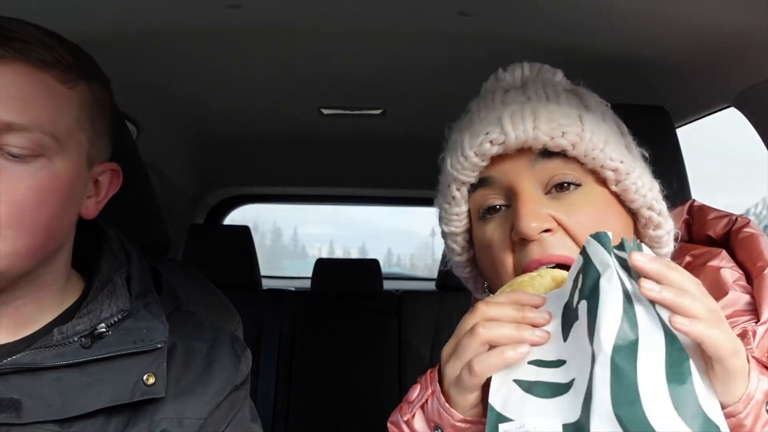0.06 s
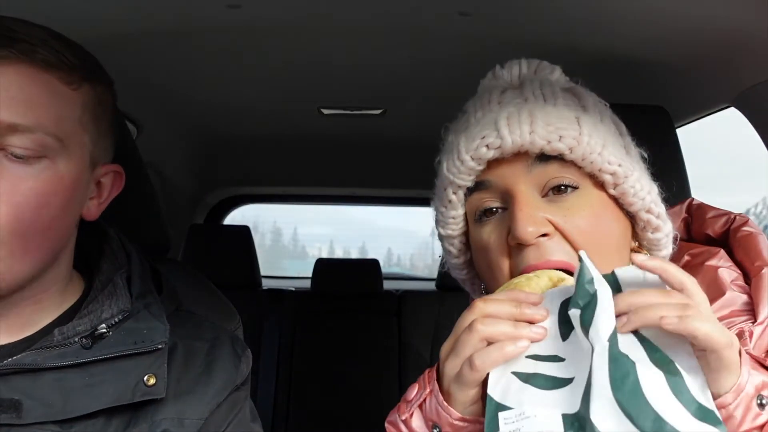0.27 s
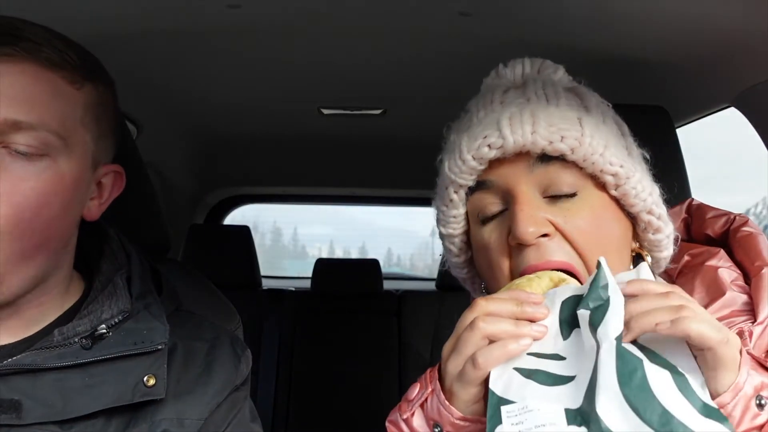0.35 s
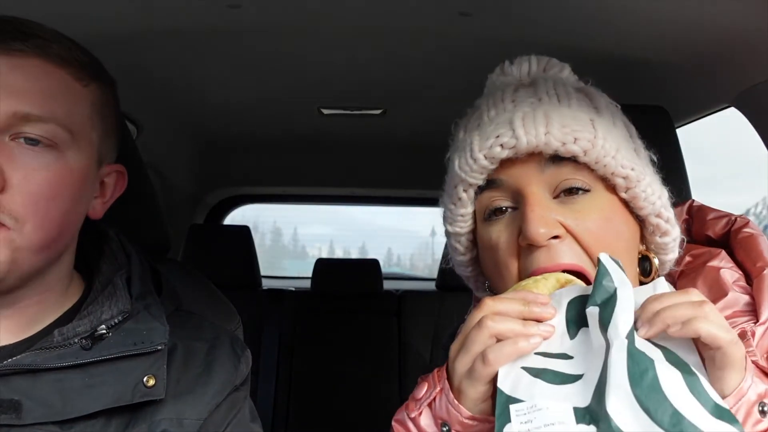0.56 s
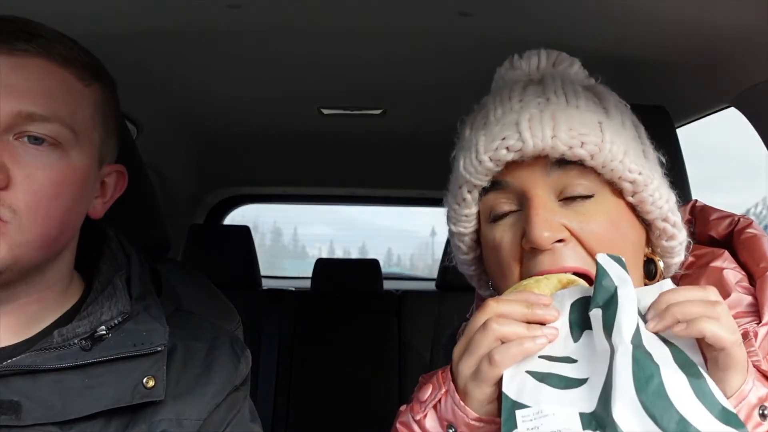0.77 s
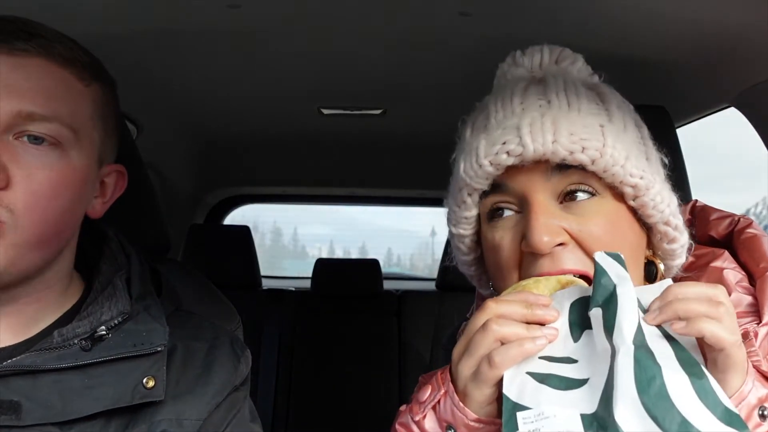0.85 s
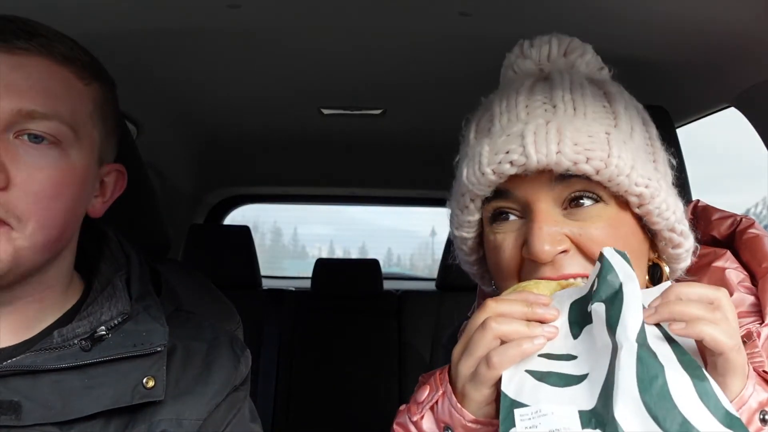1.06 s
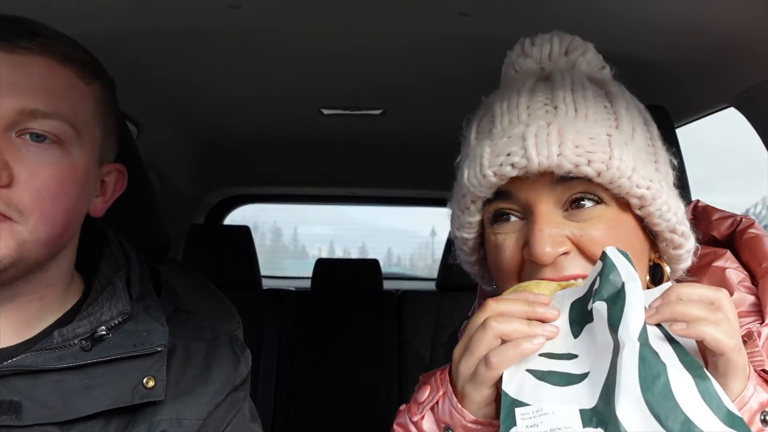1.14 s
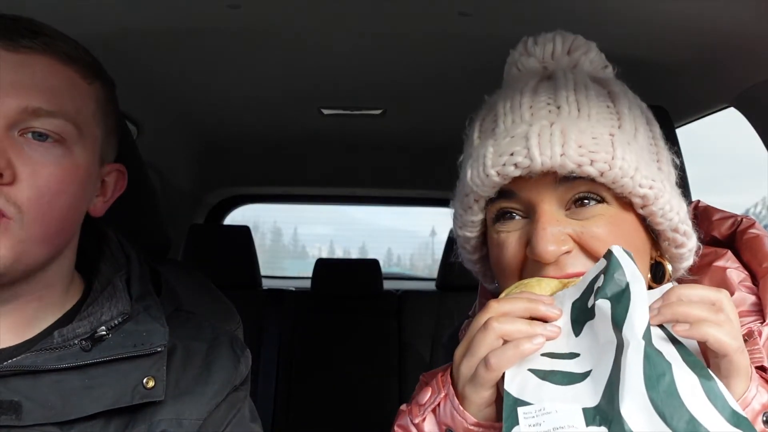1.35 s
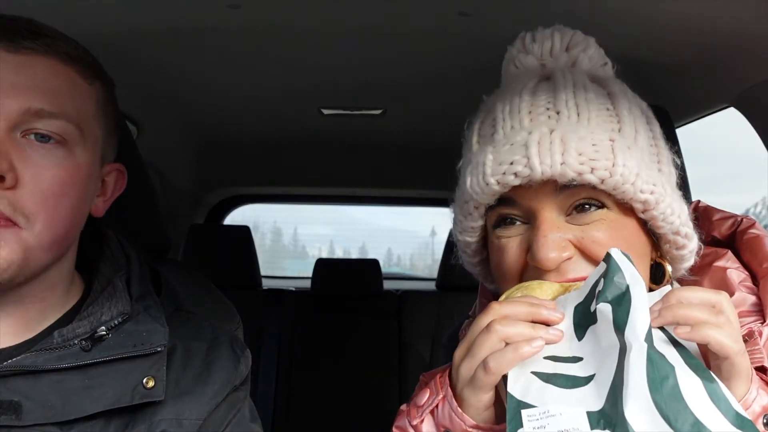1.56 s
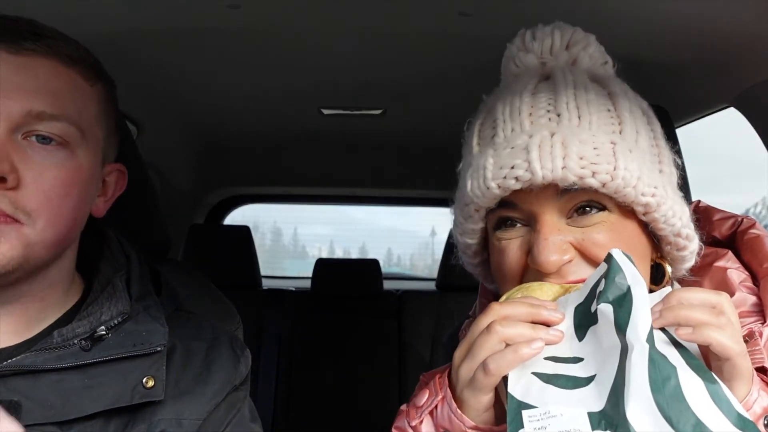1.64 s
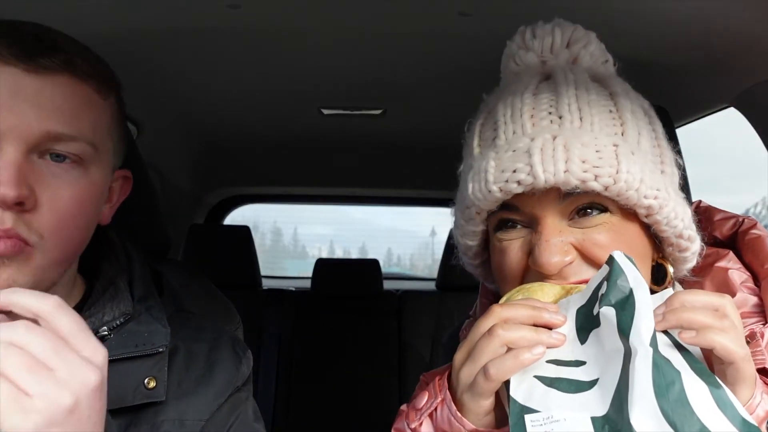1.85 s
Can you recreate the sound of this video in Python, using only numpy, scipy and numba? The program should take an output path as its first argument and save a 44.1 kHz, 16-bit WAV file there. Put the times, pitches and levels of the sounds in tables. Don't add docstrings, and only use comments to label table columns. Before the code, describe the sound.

A paper food bag crinkles in the hands, close to a phone in a parked car. Soft rustling starts it, then loud bright snaps and dense crackling from 0.2 to 0.75 s, with small hollow puffs. Another sharp crackle comes near 0.85 s, then lighter, sparser ticks, one clear snap at 1.46 s, and padded jackets brushing around 1.6 and 1.8 s. Short dry cabin tail, faint hiss.

```python
import sys
import numpy as np
from scipy import signal
from scipy.fft import rfft, irfft
from scipy.io import wavfile
from scipy.ndimage import uniform_filter1d
from numba import njit

SR = 44100
rng = np.random.default_rng(int(sys.argv[2]) if len(sys.argv) > 2 else 0)


def store_wav(level_fs):
    pcm = np.round(np.clip(np.atleast_2d(level_fs), -1, 1) * 32767)
    wavfile.write(sys.argv[1], SR, pcm.T.astype(np.int16))


def level_to_linear(level):
    exponent = np.asarray(level, float) / 20
    return 10 ** exponent


N = 83790
TREBLE_HZ = 5500


def unit(x):
    return x / np.sqrt(np.mean(x ** 2))


def split(x, hz):
    low = signal.sosfilt(signal.butter(2, min(hz, 0.45 * SR), fs=SR, output="sos"), x)
    return low, x - low


def colour(x, points):
    freq_hz, gain_db = np.array(points, float).T
    f = np.maximum(np.arange(1025) * SR / 2048, 1)
    curve_db = np.interp(np.log(f), np.log(freq_hz), gain_db)
    cepstrum = irfft(np.log(level_to_linear(curve_db)))
    cepstrum[1:1024] *= 2
    cepstrum[1025:] = 0
    response = irfft(np.exp(rfft(cepstrum)))
    return signal.fftconvolve(x, response[None], axes=1)[:, :N]


@njit
def grains(at, hz, cycles, size, zone, zones, n):
    out = np.zeros((zones, n))
    for k in range(len(at)):
        turn = np.exp((2j * np.pi - 1 / cycles[k]) * hz[k] / SR)
        state = size[k] + 0j
        end = min(n, at[k] + int(6 * cycles[k] * SR / hz[k]) + 1)
        for i in range(at[k], end):
            out[zone[k], i] += state.imag
            state *= turn
    return out


# start_s, peak_db, ring_hz, tear_db (re
CREASES = [(0.0186, -22.5, 3140, -20), (0.0427, -31.5, 2170, 13.5), (0.0487, -30.5, 7740, 9),
           (0.0667, -30.5, 3370, 7.5), (0.1153, -42, 5300, 8), (0.1261, -28, 1590, 4.5),
           (0.2149, -11, 4170, -2.5), (0.238, -37, 2160, -9), (0.2478, -23.5, 1610, 21.5),
           (0.324, -16.5, 9050, 1), (0.345, -8.5, 8550, -5), (0.384, -20, 2320, 10),
           (0.414, -20, 3620, 0), (0.4237, -28, 6840, 1), (0.4436, -6.5, 7560, -25),
           (0.4554, -19.5, 8400, 1), (0.473, -16.5, 1510, -28), (0.5057, -22, 5600, -8),
           (0.5134, -29, 5730, 8), (0.5204, -27.5, 5340, 14.5), (0.5364, -28, 3500, 12.5),
           (0.5578, -24.5, 1550, 10.5), (0.5743, -23.5, 2020, -9), (0.609, -22, 8300, 6),
           (0.621, -8.5, 8660, -6.5), (0.6354, -29, 1570, 13.5), (0.6667, -16.5, 3870, 9),
           (0.692, -24.5, 1630, 3), (0.7407, -17.5, 7230, -1),
           (0.8, -37, 3520, 17.5), (0.8353, -12, 7400, 0), (0.8581, -23, 2200, 14.5),
                 (0.862, -7, 8500, -20), (0.8825, -26, 4030, 10), (0.9253, -33.5, 1520, -6),
                 (0.952, -33, 1480, -1), (0.986, -32.5, 5850, 6), (1.0355, -21.5, 7000, 0.5),
                 (1.055, -20, 7800, -4.5), (1.0708, -22, 3680, 4.5), (1.0908, -29, 3600, 3),
                 (1.1348, -29, 1640, -4), (1.1494, -28.5, 6760, 6), (1.1927, -27, 3250, 0),
                 (1.2042, -24, 3680, 0), (1.227, -25, 1430, -2), (1.2479, -26.5, 1460, 3),
                 (1.299, -22.5, 6400, -4.5), (1.354, -26.5, 1840, -3), (1.376, -20.5, 4280, 0),
                 (1.436, -18.5, 3560, -8), (1.4613, -8, 3770, -25), (1.464, -25, 3640, -15),
                 (1.4732, -25, 4070, -5), (1.537, -18, 3340, -18), (1.557, -23.5, 2970, -30),
                 (1.6493, -22.5, 2900, -7), (1.6774, -27.5, 3460, 0.5), (1.711, -26.5, 3470, -10),
                 (1.7579, -30, 4420, -3), (1.765, -33, 1420, -10), (1.78, -39, 1440, -12),
                 (0.6317, -16, 3670, -9), (1.225, -26, 2800, -3),
           (.2519, -18.5, 7500, 11.5), (.2644, -8.5, 3420, 1), (.2777, -26, 7440, 5),
                 (.2974, -38, 7100, -7), (.3181, -17, 1720, 14), (.3568, -26, 1910, 8),
                 (.4902, -30, 5430, 10), (.6572, -32.5, 6600, 11), (.6983, -40, 1650, 15),
                 (.7274, -36, 3660, 11), (.8903, -24, 4160, -17), (1.097, -21.5, 7240, -15),
                 (1.4005, -28, 3430, -13), (1.4464, -27, 1540, -15), (1.4515, -20, 3500, -23),
                 (1.4797, -21, 3580, -12), (1.7044, -34.5, 3340, 5.5), (.0038, -35, 1490, 10),
                 (.1375, -31.5, 1500, 8), (.1794, -29, 3050, -7), (.1978, -27.5, 1480, 4),
                 (.2038, -24, 1480, 5), (.2417, -7, 6840, 0), (.2685, -11, 2030, 3),
                 (.2935, -28, 1620, -11), (.3055, -16, 3200, 2), (.369, -24, 2090, 8),
                 (.3935, -19, 2380, -2), (.669, -20.5, 2380, 7), (.8635, -15.5, 2180, -16),
                 (1.3775, -33, 2250, -10), (1.64, -30.5, 2970, 5), (1.52, -34, 2240, -9),
                 (1.581, -32, 2200, -16)]


def snaps(zones):
    lag_s, ring_cycles, tear_gain_db, tear_decay_s, thin_hz = 0.0008, 2.1, -7, 0.0017, 1250
    start_s, peak_db, ring_hz, tear_db = np.array(CREASES, float).T
    at = ((start_s + lag_s) * SR).astype(np.int64)
    zone = np.arange(len(at)) % zones
    size = level_to_linear(peak_db)
    ring_size = size * np.minimum(ring_hz / TREBLE_HZ, 1) ** (1 / 3)
    out = grains(at, ring_hz.copy(), ring_cycles + 0 * size, ring_size, zone, zones, N)
    t = np.arange(600) / SR
    tear = rng.standard_normal((len(at), len(t))) * level_to_linear(tear_gain_db) * np.exp(-t / tear_decay_s)
    tear[:, 0] += 1.3
    for a, z, g, db, tick in zip(at, zone, size, tear_db, tear):
        out[z, a:a + len(t)] += g * level_to_linear(db) * tick
    return signal.sosfilt(signal.butter(2, thin_hz, "high", fs=SR, output="sos"), out)


# start_s, length_s, first_db, last_db, treble_db (re body)
HAND_SQUEEZES = [(0, 0.095, -37.5, -32, -6.5), (0.099, 0.037, -44.5, -36.5, 4),
                 (0.161, 0.047, -46.5, -25.5, -12), (0.212, 0.1, -23.5, -18.5, 2),
                 (0.322, 0.0708, -21, -24, -0.5), (0.413, 0.027, -26, -37, -1.5),
                 (0.443, 0.069, -23.5, -34, 0), (0.519, 0.063, -30.5, -27, -2.5),
                 (0.6, 0.049, -36, -24, -10.5), (0.694, 0.056, -31, -40.5, -19.5),
                 (0.752, 0.089, -37, -32, -10.5), (0.86, 0.034, -33, -31, 0.5),
                 (0.972, 0.068, -45.5, -32, -4.5), (1.025, 0.075, -47, -31, -6.5),
                 (1.183, 0.099, -38.5, -40.5, -3), (1.378, 0.16, -47, -46, -3.5),
                 (1.45, 0.043, -52, -49, -21), (1.502, 0.087, -36.5, -54.5, -4),
                 (1.64, 0.047, -36, -54, -25), (1.697, 0.074, -49.5, -53, 5.5)]


def effort():
    edge_s, creep_db = 0.0018, -55.5
    t = np.arange(N) / SR
    body_power = np.full(N, level_to_linear(2 * creep_db))
    treble_power = body_power.copy()
    for start_s, length_s, first_db, last_db, treble_db in HAND_SQUEEZES:
        rise = np.clip((t - start_s) / edge_s + 1, 0, 1)
        fall = np.clip((start_s + length_s - t) / edge_s + 1, 0, 1)
        gain = level_to_linear(first_db + (last_db - first_db) * np.clip((t - start_s) / length_s, 0, 1))
        power = (rise * fall * gain) ** 2
        body_power += power
        treble_power += power * level_to_linear(2 * treble_db)
    return np.sqrt(body_power), np.sqrt(treble_power)


def crackle(zones):
    rate_per_s, low_hz, high_hz, cycles, spread_db = 2000, 1290, 14800, 1.33, 2
    when, pitch, rarity, ring, place = rng.random((int(rate_per_s * N / SR), 5)).T
    at = (when * N).astype(np.int64)
    hz = low_hz * (high_hz / low_hz) ** pitch
    size = level_to_linear(-spread_db * np.log(np.maximum(rarity, 0.015))) * hz / high_hz
    size = size / np.sqrt(np.mean(size ** 2 / hz))
    gain, treble = effort()
    size = size * np.where(hz > TREBLE_HZ, treble[at], gain[at])
    size = size / np.sqrt(rate_per_s * cycles / 2)
    zone = (place * zones).astype(np.int64)
    return grains(at, hz, cycles * (0.32 + ring), size, zone, zones, N)


def rub(zones):
    rub_db, thin_hz, body_hz, body_db = -12, 295, 1080, 2
    low, high = split(rng.standard_normal((zones, N)), TREBLE_HZ)
    body, middle = split(split(low, thin_hz)[1], body_hz)
    gain, treble = effort()
    grit = level_to_linear(3.84 * unit(uniform_filter1d(rng.standard_normal((zones, N)), size=150)))
    body_gain = level_to_linear(body_db) * np.sqrt(gain * treble)
    slide = body_gain * body + gain * middle + treble * high
    return level_to_linear(rub_db) * grit * slide / np.sqrt(zones)


# start_s, level_db, pitch_hz
AIR_PUSHES = [(.004, -45, 860), (.03, -44, 450), (.041, -29.5, 790), (.06, -45.5, 480), (0.204, -56, 200),
              (0.263, -23.5, 566), (.32, -36.5, 278), (0.669, -37.5, 348), (0.69, -41, 530),
              (.718, -40.5, 526), (0.832, -42, 450), (.875, -53, 450), (1.033, -49, 486), (1.087, -57, 494),
              (1.3, -59, 500), (1.353, -60, 500), (1.464, -46.5, 490), (1.513, -50, 450), (1.646, -59, 600),
              (1.76, -48, 328), (1.82, -45, 353)]


def puffs(zones):
    start_s, level_db, pitch_hz = np.array(AIR_PUSHES, float).T
    at = (start_s * SR).astype(np.int64)
    zone = np.arange(len(at)) % zones
    return grains(at, pitch_hz.copy(), 3.6 + 0 * start_s, level_to_linear(level_db), zone, zones, N)


# time_s, level_db
SLEEVE_LEVEL = [(0, -41), (.9, -50), (1.0, -55), (1.12, -50.5), (1.33, -56), (1.4, -53), (1.58, -42),
                (1.621, -50), (1.7, -52.5), (1.74, -45.5), (1.775, -40), (1.84, -42), (1.9, -47)]
# freq_hz, gain_db
NYLON_TONE = [(250, -8), (550, -7), (1000, 0), (1450, -1), (2200, -6.5), (3000, 3.5), (5000, -1.5),
              (12000, -2.5)]


def sleeve(zones):
    peak_hz, width_hz, thin_hz = 4900, 19700, 625
    level = level_to_linear(np.interp(np.arange(N) / SR, *np.array(SLEEVE_LEVEL).T))
    noise = rng.standard_normal((zones, N))
    grit = noise * level_to_linear(3.5 * unit(uniform_filter1d(rng.standard_normal((zones, N)), size=60)))
    b, a = signal.iirpeak(peak_hz, peak_hz / width_hz, fs=SR)
    brush = unit(split(signal.lfilter(b, a, grit), thin_hz)[1])
    return colour(level * brush / np.sqrt(zones), NYLON_TONE)


def even(tails, like):
    f = np.arange(1, 2049) * SR / 4096
    own_db = 10 * np.log10(uniform_filter1d(np.abs(rfft(like, 4096)[:, 1:]) ** 2, size=15))
    own_db = own_db - own_db.mean() - 0.6 * (own_db - own_db.mean(0))
    return np.vstack([colour(h[None], np.c_[f, -db]) for h, db in zip(tails, own_db)])


def cabin(parts):
    t60_low_s, t60_high_s, tail_db, gap_s = 0.075, 0.05, -1, 0.0004
    early_db, early_s = 1, 0.002
    side_low_db, side_high_db, side_thin_hz = -14.5, -9, 450
    t = np.arange(4000) / SR

    def fade(t60_s):
        return level_to_linear(-60 * t / t60_s) / np.sqrt(t60_s * SR / np.log(1e6))

    low, high = split(rng.standard_normal((2, len(parts), len(t))), 4400)
    low, high = low * fade(t60_low_s), high * fade(t60_high_s)
    late = level_to_linear(tail_db) * np.clip(t / gap_s, 0, 1) * (1 + level_to_linear(early_db) * np.exp(-t / early_s))
    mid = late * (low[0] + high[0])
    mid[:, 0] += 1
    side = late * (low[1] * level_to_linear(side_low_db) + high[1] * level_to_linear(side_high_db))
    side = split(side, side_thin_hz)[1]

    def through(response):
        heard = signal.fftconvolve(parts, even(response, mid), axes=1)[:, :N].sum(0)
        return heard / np.sqrt(1 + level_to_linear(2 * tail_db))

    m, s = through(mid), through(side)
    return np.array([m + s, m - s])


# freq_hz, gain_db
BODY_TONE = [(60, -65), (230, -30), (530, -13.5), (720, -18.5), (950, -15.5), (1100, -9.5), (1230, -15),
             (1320, -9), (1400, -3), (1600, -1), (1800, -8), (2140, -2.5), (2330, -3.5), (2470, -9),
               (2800, -8.5)]
# freq_hz, gain_db; from the fourth row also the tone of the hiss
TREBLE_TONE = [(3000, -2), (3650, 0.5), (4600, -2), (7200, 0), (15500, -8.5), (15800, -2), (16000, -49)]


def bag_to_phone(x):
    treble = [(hz, db - 3.5) for hz, db in TREBLE_TONE]
    return colour(x, BODY_TONE + treble)


def floor():
    hum_db, hum_hz, hiss_db = -84.5, 263, -59
    outside, mid, side = rng.standard_normal((3, N))
    hum = unit(signal.lfilter(*signal.iirpeak(hum_hz, 1.2, fs=SR), outside))
    hiss = np.array([mid + side, mid - side])
    hiss = split(split(hiss, 1500)[1], 810)[1]
    return level_to_linear(hum_db) * hum + level_to_linear(hiss_db) * colour(hiss, TREBLE_TONE[3:])


def scene():
    zones, pan_db = 5, -2
    pan = level_to_linear(np.array([[pan_db / 2], [-pan_db / 2]]))
    bag = cabin(crackle(zones) + snaps(zones) + rub(zones) + puffs(zones)) * pan
    coat = cabin(sleeve(zones))
    return level_to_linear(4.5) * bag_to_phone(bag + coat) + floor()


def band_limit(x):
    return signal.sosfilt(signal.butter(12, 16650, fs=SR, output="sos"), x)


def record(dry):
    return band_limit(dry)


dry = scene()
out = record(dry)
store_wav(out)
```